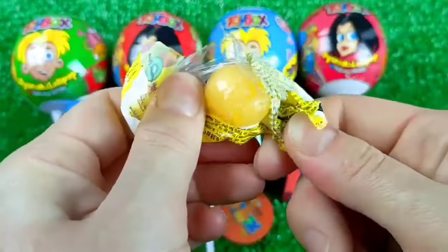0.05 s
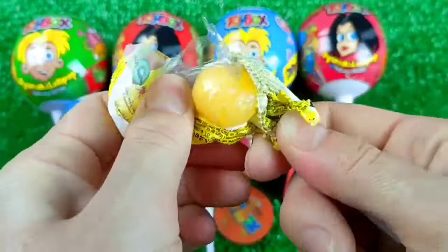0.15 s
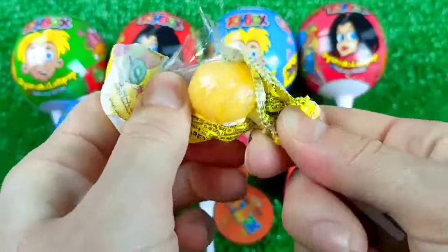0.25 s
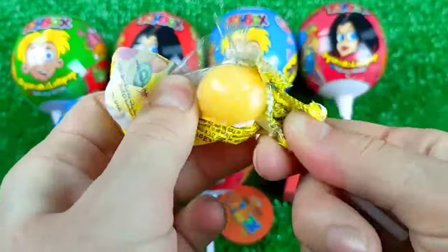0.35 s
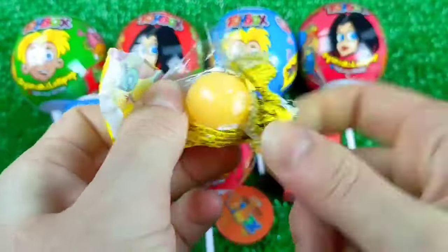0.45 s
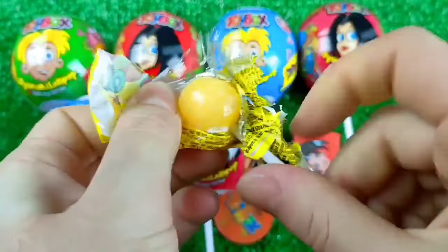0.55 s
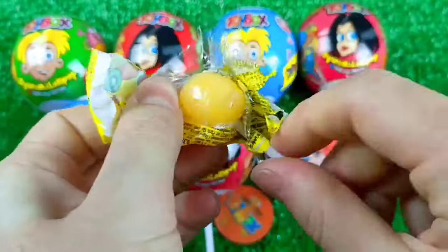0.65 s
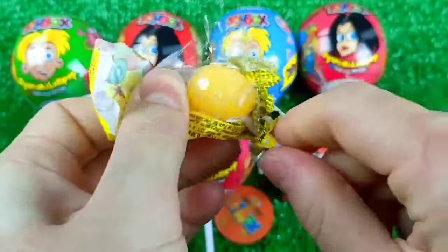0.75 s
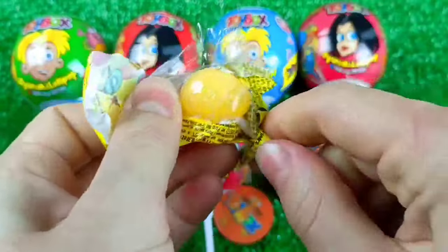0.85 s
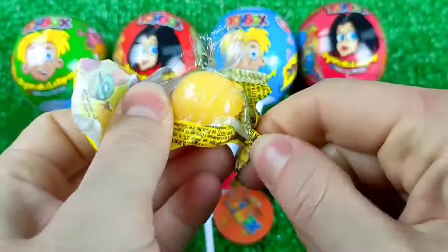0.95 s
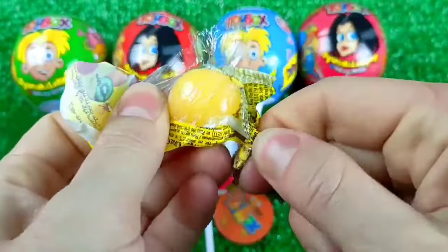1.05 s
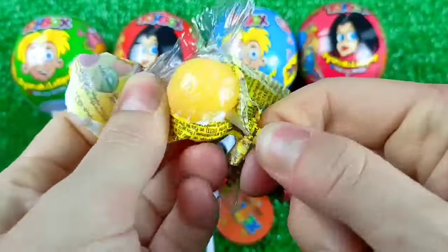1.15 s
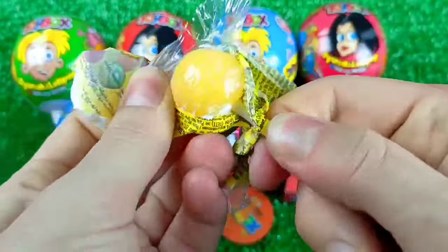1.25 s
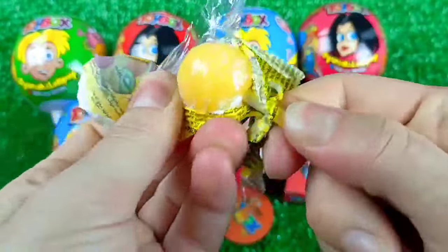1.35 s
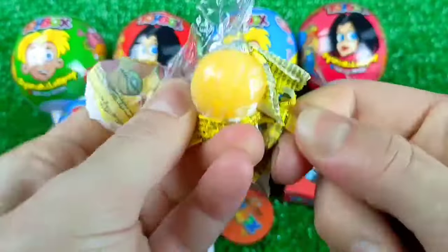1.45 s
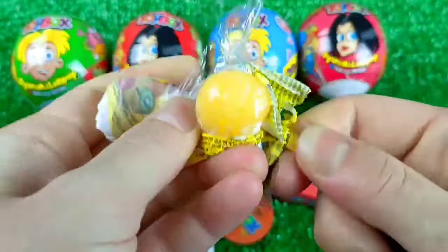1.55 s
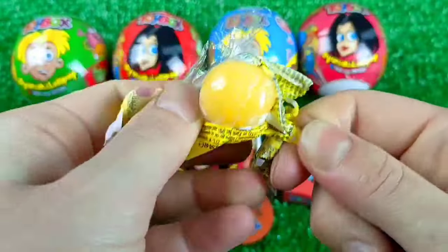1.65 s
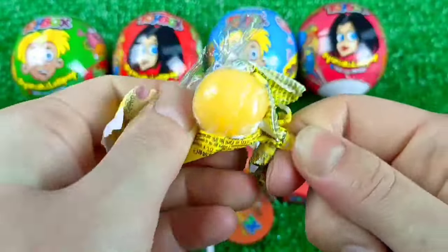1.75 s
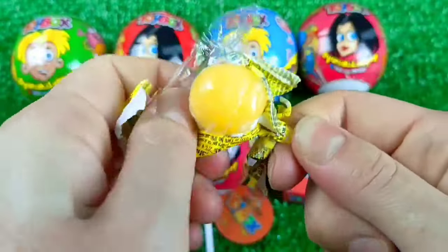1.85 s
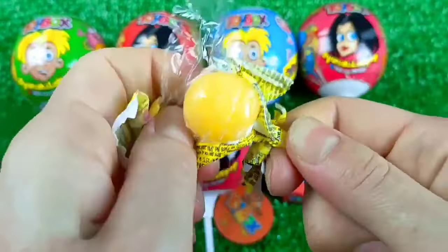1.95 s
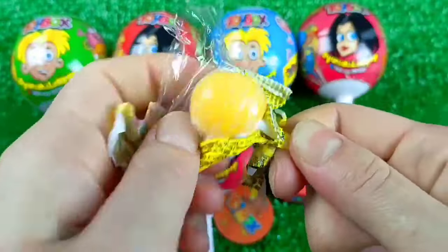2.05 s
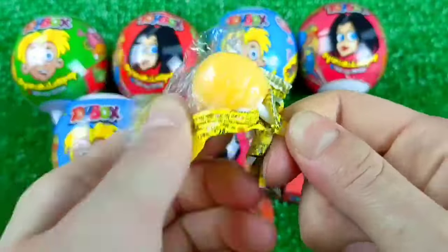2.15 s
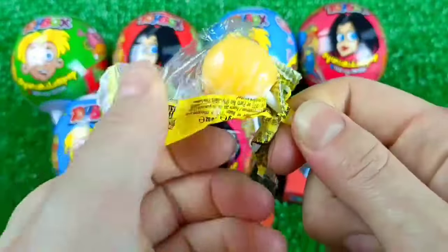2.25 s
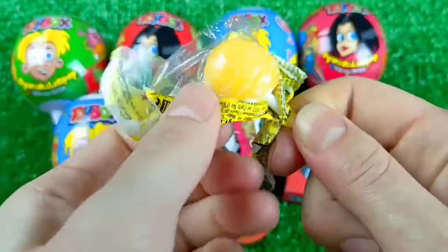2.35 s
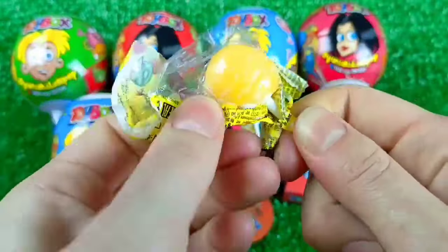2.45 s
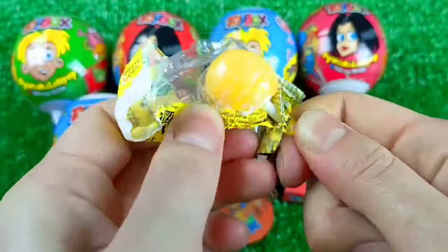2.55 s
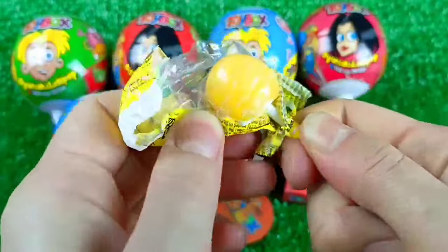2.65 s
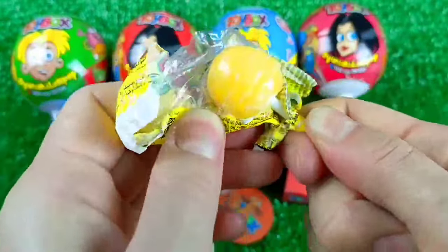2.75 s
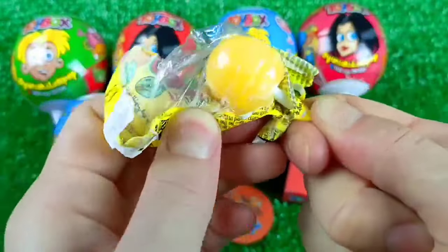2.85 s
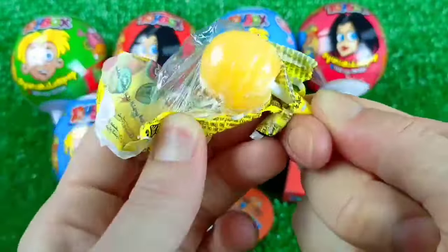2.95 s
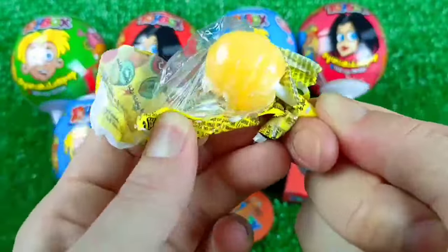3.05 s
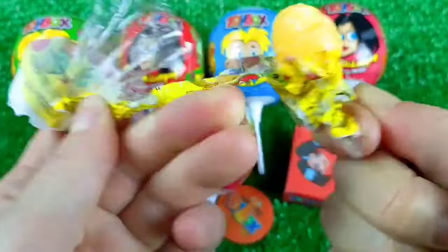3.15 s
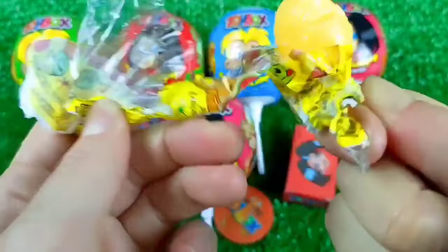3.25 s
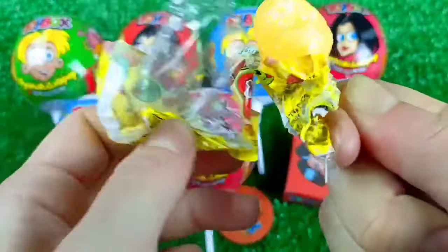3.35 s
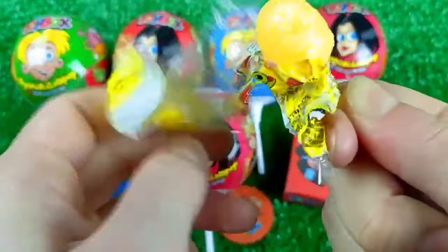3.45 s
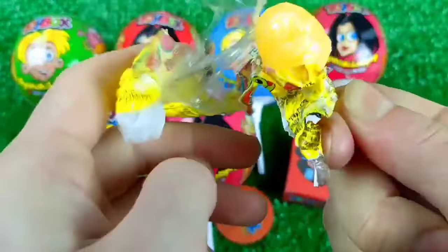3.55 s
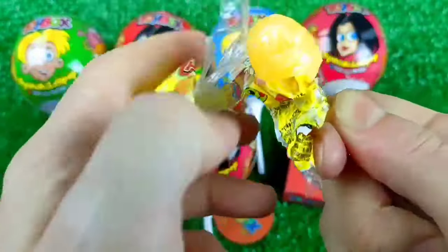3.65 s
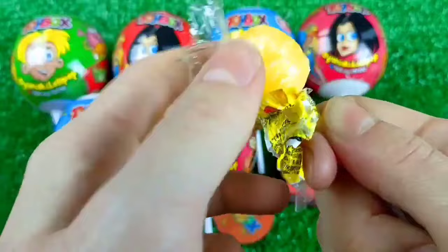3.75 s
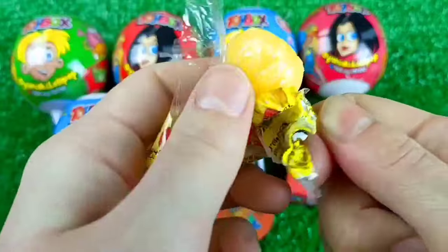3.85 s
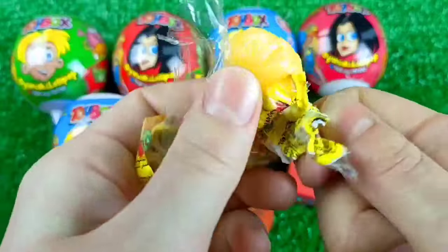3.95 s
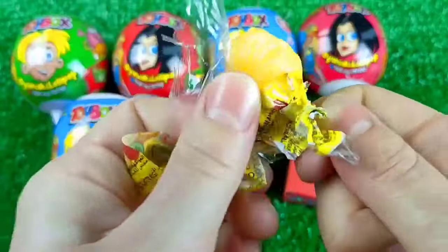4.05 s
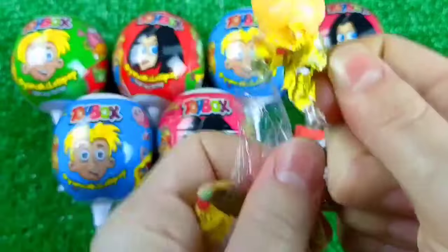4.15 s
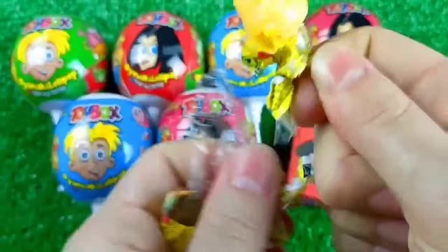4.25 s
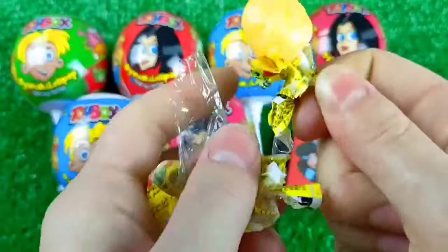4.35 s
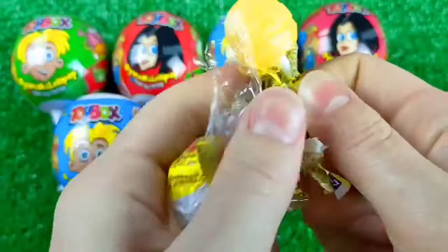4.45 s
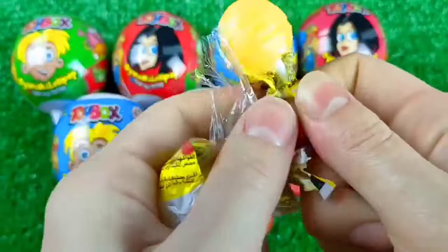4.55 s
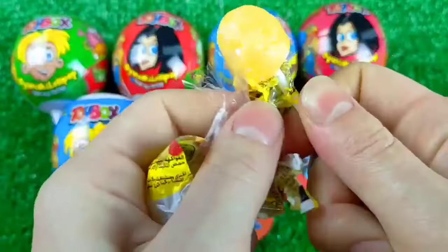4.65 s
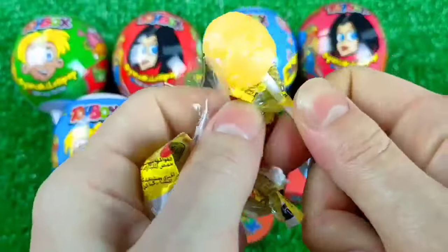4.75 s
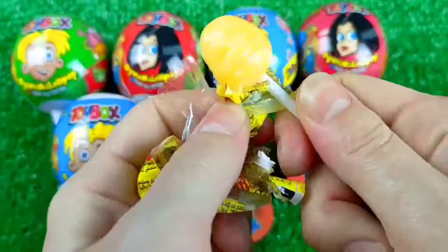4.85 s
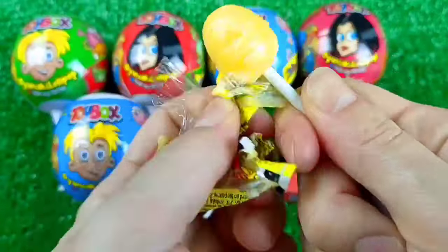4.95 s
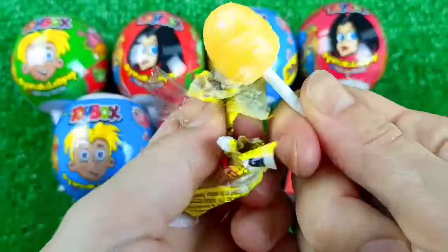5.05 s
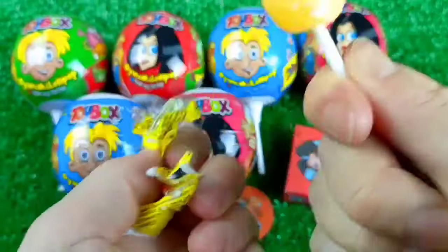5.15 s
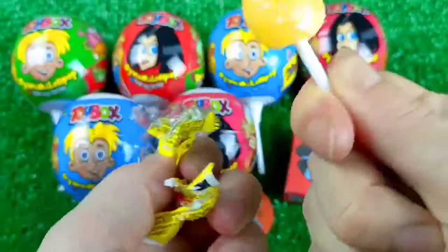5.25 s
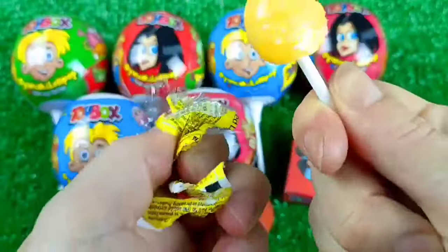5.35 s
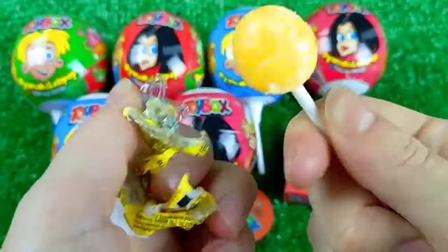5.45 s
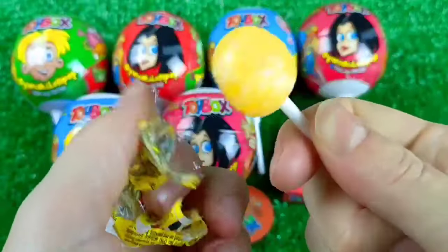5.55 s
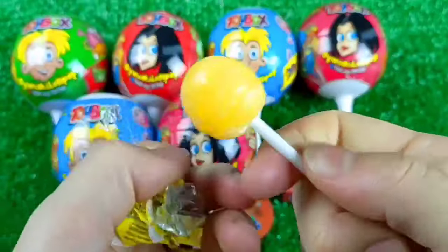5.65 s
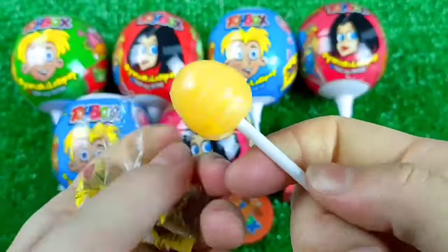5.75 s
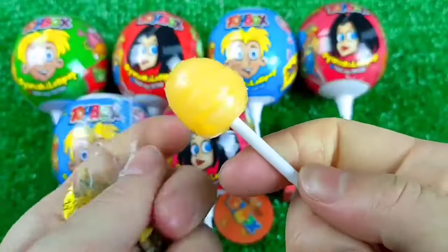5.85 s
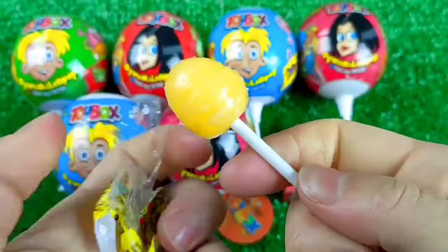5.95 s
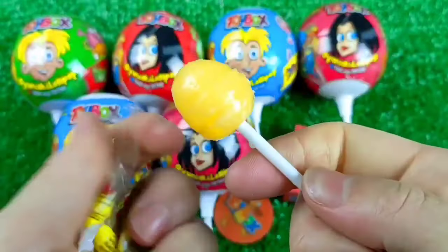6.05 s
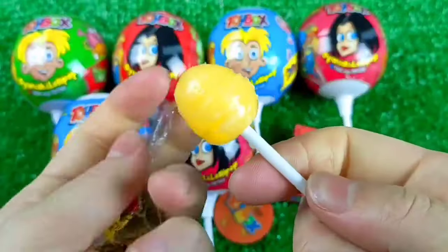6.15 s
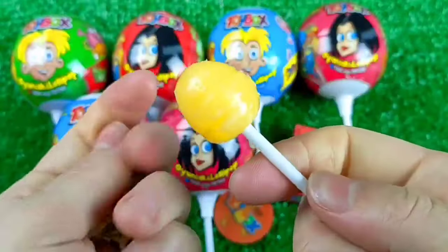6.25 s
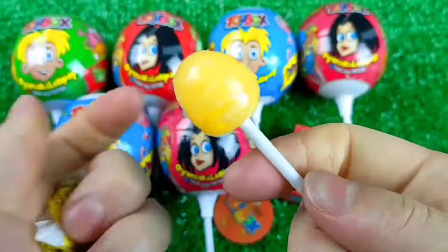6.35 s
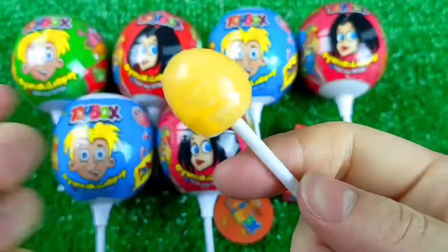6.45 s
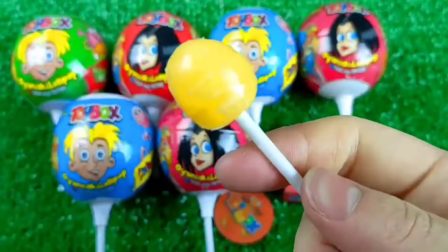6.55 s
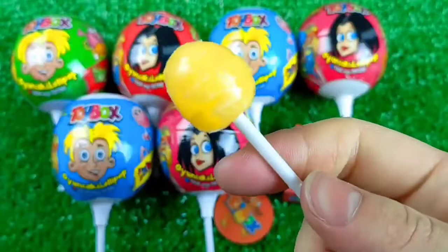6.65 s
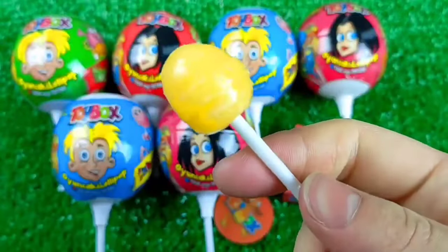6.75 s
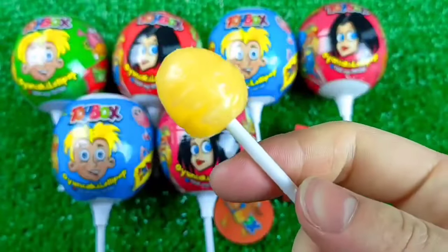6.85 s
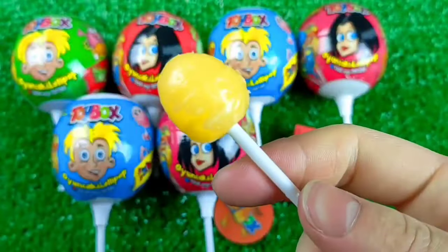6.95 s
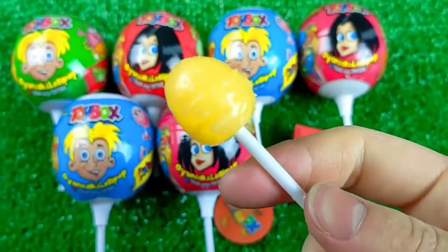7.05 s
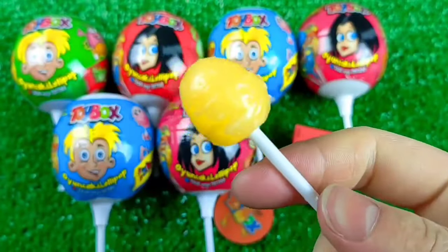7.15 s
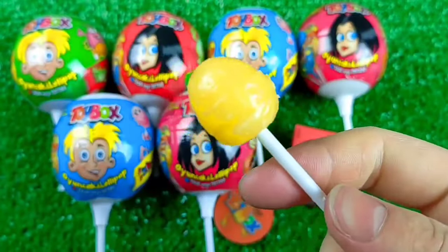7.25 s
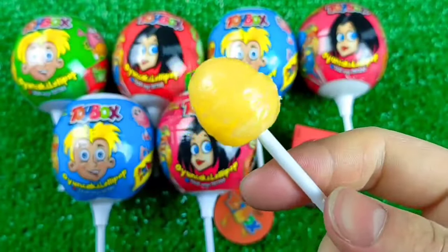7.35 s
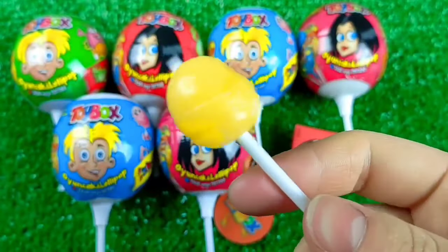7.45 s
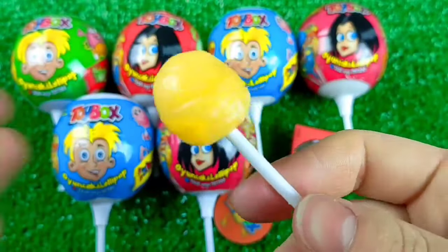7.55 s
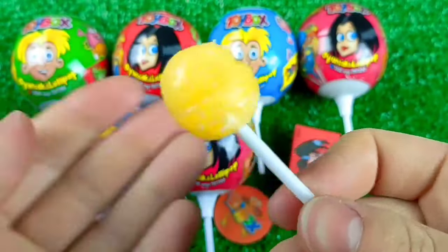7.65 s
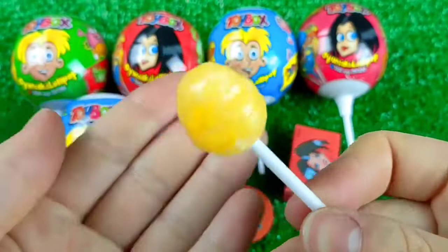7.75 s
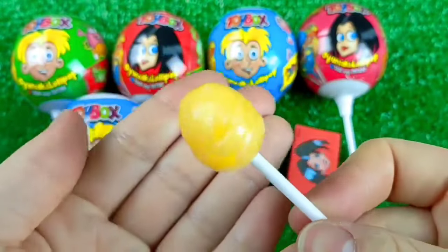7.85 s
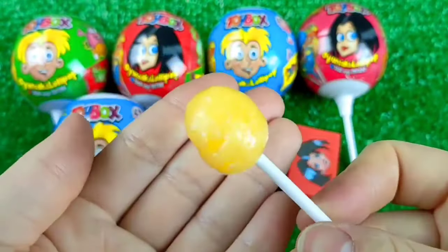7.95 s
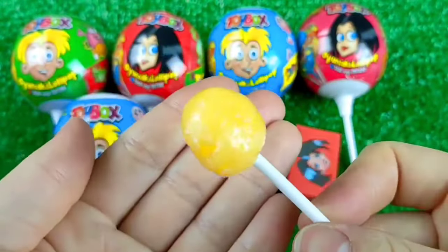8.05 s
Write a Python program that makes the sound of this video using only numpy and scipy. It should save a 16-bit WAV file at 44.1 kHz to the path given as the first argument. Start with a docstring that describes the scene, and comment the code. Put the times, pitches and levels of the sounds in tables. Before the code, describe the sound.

Crisp film clicks, irregular and bright, sit over a thin bed of crinkling with soft finger rubs and faint low hand rumble. A sudden tear bursts out about three seconds in; a loud crackle comes a second later and a thumping pop a second after that. Busy balled-up crinkling then dies away, leaving almost nothing. Close microphone, slightly left, small indoor space with little echo.

```python
"""A stiff plastic wrapper snaps as two hands peel it off a lollipop, close by in a small room.
Each snap is a buckling facet: an impulse and its rebound excite resonances of the film.
Random trains of tiny resonant clicks make the bed of crinkling; dense breaks make one rip along the seam.
Finger rubs are bands of noise, bumps are decaying pulses, and hand motion and air are coloured noise."""
import sys
import numpy as np
from scipy import signal
from scipy.fft import rfft, irfft
from scipy.io import wavfile
from scipy.ndimage import uniform_filter1d

SR = 44100
rng = np.random.default_rng(int(sys.argv[2]) if len(sys.argv) > 2 else 0)


def dump_mix(stems):
    """Bounce the given channels to the path in sys.argv[1] as a 16-bit WAV at rate SR."""
    frames = np.atleast_2d(stems).T  # one column per channel
    limited = np.clip(frames, -1, 1)  # hard clip at full scale
    pcm = np.round(limited * 32767).astype(np.int16)
    wavfile.write(sys.argv[1], SR, pcm)


N = 356764


def from_db(db):
    """Level law: amplitude gain is ten to the power of decibels over twenty."""
    return 10 ** (np.asarray(db) / 20)


def rms_one(x):
    """Power normalisation: scale to unit rms."""
    return x / np.sqrt(np.mean(x ** 2) + 1e-30)


def in_time(rows):
    """Linear interpolation: one sample-rate curve for each column after the time."""
    s, *columns = np.transpose(rows)
    t = np.arange(N) / SR
    return [np.interp(t, s, column) for column in columns]


def drift(s, rate):
    """Interpolated random process: smooth chance of spread 1 at times s, with rate new values a second."""
    knots = rng.standard_normal(1000)
    return np.interp(s * rate, np.arange(len(knots)), knots) / np.sqrt(2 / 3)


def band(x, low_hz, high_hz, order=2):
    """Band limitation: a causal Butterworth band-pass."""
    edges_hz = [low_hz, min(high_hz, .45 * SR)]
    return signal.sosfilt(signal.butter(order, edges_hz, "band", fs=SR, output="sos"), x)


def resonate(x, hz, width_hz):
    """Damped resonance: a pole pair with gain near 1 at its peak."""
    radius = np.exp(-np.pi * width_hz / SR)
    feed = np.array([1, 0, -1]) * (1 - radius * radius) / 2
    feedback = [1, -2 * radius * np.cos(2 * np.pi * hz / SR), radius * radius]
    return signal.lfilter(feed, feedback, x + 1e-18)


def colour(x, spectrum, size=2048):
    """Minimum-phase filtering: the folded cepstrum gives a causal filter of the wanted spectrum; rms 1."""
    hz, db = np.transpose(spectrum)
    grid_hz = np.maximum(np.arange(size // 2 + 1) * SR / size, 10)
    # the level falls away outside the given points
    points_hz = np.r_[hz[0] / 2, hz, hz[-1] * 2]
    points_db = np.r_[db[0] - 20, db, db[-1] - 40]
    curve_db = np.interp(np.log(grid_hz), np.log(points_hz), points_db)
    cepstrum = irfft(np.log(from_db(curve_db)))
    cepstrum[1:size // 2] *= 2
    cepstrum[size // 2 + 1:] = 0
    response = irfft(np.exp(rfft(cepstrum)))
    return rms_one(signal.oaconvolve(x, response[None], axes=1)[:, :N])


def delayed(x, seconds):
    """Propagation delay: the same sound, later."""
    return np.r_[np.zeros(int(abs(seconds) * SR)), x][:len(x)]


def add(out, s, sound):
    """Superposition: mix a short stereo sound in at s seconds."""
    i = max(int(s * SR), 0)
    out[:, i:i + sound.shape[1]] += sound[:, :max(N - i, 0)]


def panned(db):
    """Constant-power panning: gains whose left side is db above the right."""
    return rms_one(from_db([[db / 2], [-db / 2]]))


def each_at(sounds, db):
    """Energy scaling: bring each of a stack of short stereo sounds to its level, taken over 4 ms."""
    energy = np.mean(np.sum(sounds ** 2, axis=2), axis=1)
    window = .004 * SR
    return sounds * (from_db(db) * np.sqrt(window / energy))[:, None, None]


def evened(x, window_s=0.052):
    """Energy balance: steady pressure releases a steady flow of energy, however it is split into grains."""
    power = uniform_filter1d(np.mean(x ** 2, axis=0), int(window_s * SR))
    return x / np.sqrt(np.maximum(power, 0) + 0.019)


# Spectrum of the steady air noise. Each row: frequency in Hz, relative density in dB per Hz.
AIR_SPECTRUM = [(18, -24.5), (30, 7), (210, -10), (473, -19.5), (554, -23.5), (937, -11), (1460, -18),
                (3140, -24), (16000, -42)]


def air_noise():
    """Stationary noise: steady coloured noise, independent on the two sides."""
    return from_db(-77.5) * colour(rng.standard_normal((2, N)), AIR_SPECTRUM)


# Reflections off nearby surfaces. Each row: delay to the left in seconds, delay to the right in seconds,
# level in dB relative to the direct sound.
REFLECTIONS = [(.0021, 0.0022, -15.5), (.0047, 0.0066, -17.5), (.0098, 0.018, -21.5)]


def room(x, t60_s=0.11, tail_db=-11, onset_s=0.0018):
    """Early reflection and reverberation: a few delayed copies and a short diffuse, decaying tail."""
    t = np.arange(SR // 2) / SR
    decay = from_db(-60 * t / t60_s) * (1 - np.exp(-t / onset_s))
    tail = band(rng.standard_normal((2, len(t))), 330, 11000, order=1) * decay
    tail = rms_one(tail) / np.sqrt(len(t))   # unit energy on average
    out = x + from_db(tail_db) * signal.oaconvolve(x, tail, axes=1)[:, :N]
    for left_s, right_s, db in REFLECTIONS:
        out += from_db(db) * np.array([delayed(x[0], left_s), delayed(x[1], right_s)])
    return out


# Hollows between the cupped hands and the table, lifting or cancelling.
# Each row: resonance in Hz, gain at the resonance in dB.
HAND_HOLLOWS = [(470, -3.5), (740, 4.5), (1280, 1.5), (1850, 6)]


def cupped(x):
    """Cavity resonance: the space under the hands colours the sound; soft skin keeps its resonances broad."""
    for hz, db in HAND_HOLLOWS:
        x = x + (from_db(db) - 1) * resonate(x, hz, .3 * hz)
    return x


# Low rumble of the moving hands. Each row: time in seconds, level in dB before a common lift of 3 dB.
HAND_MOTION = [(0, -73), (2.5, -72.5), (3.3, -69), (4.5, -71), (6.0, -71), (7.5, -71), (7.9, -89.5),
               (8.05, -105)]
# Spectrum of that rumble. Each row: frequency in Hz, relative density in dB per Hz.
MOTION_SPECTRUM = [(20, -4), (50, -5), (100, -11.5), (200, -11.5), (400, -17), (900, -32.5)]


def hand_motion():
    """Partly coherent noise: moving hands stir the air in a faint rumble, partly shared by the two sides."""
    level_db, = in_time(HAND_MOTION)
    stirred_air = .7 * rng.standard_normal(N) + rng.standard_normal((2, N))
    return from_db(level_db + 3.0) * colour(stirred_air, MOTION_SPECTRUM) * panned(2.6)


# The hands jolting as the film gives way. Each row: start in seconds, peak level in dB before panning.
HAND_JOLTS = [(0.066, -42), (1.572, -49), (1.917, -56), (3.189, -47.5), (3.308, -39.5), (3.328, -43),
              (4.943, -44.5), (5.312, -28), (5.959, -50), (6.128, -47), (6.532, -42)]


def hand_jolts():
    """Impulsive excitation: each jolt is a dull, exponentially decaying pulse."""
    out = np.zeros((2, N))
    t = np.arange(N // 40) / SR
    fade_s = np.array([[.004], [.002]])   # left, right
    thud = band(np.exp(-t / fade_s), 25, 405, order=1)
    thud = thud / thud.max()
    for s, db in HAND_JOLTS:
        add(out, s, from_db(db) * thud * panned(2.5))
    return out


# Fingers rubbing on the wrapped sweet. Each row: middle in seconds, level in dB,
# a third of the whole swell in seconds, frequency in Hz about which the noise band lies.
FINGER_RUBS = [(0.652, -56, 0.015, 606), (0.821, -63, 0.022, 708), (1.67, -58, .016, 247),
               (1.836, -55.5, 0.019, 810), (2.374, -50.5, 0.0056, 330), (2.408, -48.5, 0.014, 398),
               (2.672, -53, 0.0048, 500), (3.675, -40.5, 0.011, 272), (3.79, -64, 0.057, 220),
               (4.236, -72, 0.013, 686), (4.485, -61, .02, 687), (4.674, -59, 0.018, 330),
               (6.13, -50.5, 0.014, 325)]


def finger_rubs():
    """Friction noise: skin dragging over the film is a swelling band of noise."""
    out = np.zeros((2, N))
    for s, db, length_s, hz in FINGER_RUBS:
        swell = np.hanning(int(3 * length_s * SR))
        drag = rms_one(band(rng.standard_normal(N // 20), hz * 0.6, hz * 1.32))
        drag = drag[-len(swell):]   # the filter has settled
        add(out, s - len(swell) / SR / 2, from_db(db) * drag * swell * panned(1.4))
    return out


# The seam ripping. Each row: time in seconds, level in dB.
SEAM_RIP = [(3.292, -68.5), (3.2945, -20), (3.302, -14.5), (3.312, -22), (3.321, -17), (3.331, -25),
            (3.343, -22), (3.352, -43.5), (3.375, -59)]
# Spectrum of the rip. Each row: frequency in Hz, relative density in dB per Hz.
RIP_SPECTRUM = [(59, -52.5), (100, -23), (365, -23.5), (558, -19.5), (784, -5), (854, -15), (1030, -8.5),
                (1150, -17.5), (2000, -8), (3250, -8.5), (4570, -5), (9210, -21), (13500, -20),
                (16000, -29.5)]


def rip():
    """Fracture as a random impulse train: the tear runs along the seam in hundreds of tiny breaks."""
    level_db, = in_time(SEAM_RIP)
    t = np.arange(N) / SR
    tearing = (t > SEAM_RIP[0][0]) * (t < SEAM_RIP[-1][0])
    # part of each break is common to both sides, part has its own sign on each
    signs = 1.2 * rng.choice([-1, 1], N) + rng.choice([-1, 1], (2, N))
    breaks = (rng.random(N) < 9000 / SR) * signs
    return from_db(level_db) * tearing * evened(colour(breaks, RIP_SPECTRUM), window_s=.006)


SQUEEZE_DROP_DB, SQUEEZE_ROUNDNESS = 11.5, 1.32   # fall over one swell or fade time; 1 = pointed, 2 = bell
GRIP_FLEX_DB, GRIP_FIZZ_DB = -6.5, -10.5   # relative to the crinkle of the grip
# Squeezes and pulls: picking the twisted end open, peeling the film back and pulling it apart,
# dragging the rest off the sweet, crumpling it in the fist. Each row: peak in seconds, swell in seconds,
# fade in seconds, then relative levels in dB of crinkle, flexing of wide folds, fizz of the finest creases.
FINGER_SQUEEZES = [ (0.0, .02, 0.024, -27.5, -33, -38.5), (.18, 0.16, 0.18, -44, -68, -51.5),
                   (.655, 0.015, 0.053, -40.5, -53.5, -46.5), (0.808, 0.026, 0.022, -44.5, -53.5, -50),
                   (0.881, 0.0055, 0.082, -43.5, -50, -50), (.975, 0.029, .08, -49, -54.5, -54),
                   (1.275, 0.062, 0.091, -48, -50.5, -55), (1.35, 0.026, 0.054, -44.5, -60, -48),
                   (1.5, 0.034, 0.056, -44, -56, -47), (1.575, .015, 0.021, -40, -71, -45),
                   (1.7, 0.16, 0.037, -42.5, -59.5, -54), (1.835, 0.055, 0.02, -30, -40.5, -40.5),
                   (2.02, 0.089, 0.12, -40, -54, -49), (2.16, .02, 0.054, -46, -64, -66),
                   (2.3, 0.078, 0.059, -35, -44.5, -47), (2.411, 0.038, 0.009, -35, -31.5, -39.5),
                   (2.553, .009, 0.022, -39, -47, -50), (2.698, 0.11, 0.048, -44.5, -43.5, -55.5),
                   (2.866, 0.066, 0.055, -53, -57, -62), (3.07, 0.046, 0.099, -45, -51.5, -50),
                   (3.15, 0.037, .055, -34, -43, -50), (3.26, 0.07, 0.017, -41.5, -57, -54),
                   (3.361, 0.041, 0.059, -41, -41, -47), (3.475, .02, 0.047, -48.5, -48, -58),
                   (3.584, .03, 0.038, -49, -50.5, -57), (3.672, 0.028, .024, -34, -38, -42.5),
                   (3.76, 0.087, 0.1, -48, -48, -60), (3.84, 0.11, 0.069, -59, -49.5, -65),
                   (4.013, 0.061, 0.15, -38.5, -43, -49), (4.17, 0.015, .07, -31, -48.5, -43),
                   (4.232, 0.0084, 0.017, -16, -30.5, -29), (4.317, 0.076, 0.054, -26, -33, -33.5),
                   (4.47, 0.015, 0.041, -28.5, -36, -40.5), (4.613, 0.037, 0.16, -37, -42.5, -48.5),
                   (4.742, 0.033, .045, -32.5, -43, -46), (4.846, 0.029, 0.029, -31, -47, -41),
                   (4.96, 0.026, 0.13, -45, -55, -56), (5.085, 0.092, 0.095, -38.5, -59, -43),
                   (5.131, 0.014, .03, -33, -41.5, -40), (5.2, 0.02, 0.11, -39, -43.5, -55),
                   (5.316, .04, 0.028, -34.5, -38.5, -46.5), (5.55, 0.11, 0.083, -39, -50, -51),
                   (5.654, 0.037, 0.023, -34.5, -40.5, -46), (5.812, 0.034, 0.06, -36, -49, -45.5),
                   (5.953, 0.032, 0.012, -27.5, -34.5, -42), (6.06, 0.16, 0.085, -36.5, -53, -47.5),
                   (6.128, 0.047, .012, -30.5, -35, -41), (6.26, 0.02, 0.11, -29, -41.5, -40.5),
                   (6.35, 0.036, 0.025, -29.5, -48.5, -39), (6.502, 0.19, 0.049, -40, -52, -51),
                   (6.664, 0.039, 0.053, -31, -55, -45), (6.793, 0.05, 0.12, -33.5, -61, -47),
                   (6.953, 0.07, 0.15, -42, -57, -54), (7.144, 0.047, 0.057, -49.5, -51.5, -56),
                   (7.3, 0.065, 0.12, -49.5, -59, -60), (7.46, 0.051, 0.11, -61, -65, -73),
                   (7.75, 0.032, 0.032, -63.5, -72, -71.5)]
# Faint stirring of the film while it is held. Each row: time in seconds, relative crinkle level in dB.
STEADY_GRIP = [(0, -66.5), (.55, -50), (.8, -68), (1.2, -57), (2.2, -60), (2.48, -80), (2.7, -59),
               (3.0, -60), (3.5, -55.5), (5.85, -53), (6.2, -72), (7.55, -58.5), (7.68, -87.5), (8.09, -86)]


def working():
    """Power addition: squeezes swell and fade on the steady grip; returns crinkle, flex and fizz in dB."""
    t = np.arange(0, N / SR, .001)
    grip_db = np.interp(t, *np.transpose(STEADY_GRIP))
    power = from_db(grip_db + np.array([[0], [GRIP_FLEX_DB], [GRIP_FIZZ_DB]])) ** 2
    for s, swell_s, fade_s, *peaks_db in FINGER_SQUEEZES:
        away = np.abs((t - s) / np.where(t < s, swell_s, fade_s))
        levels_db = np.array(peaks_db)[:, None] - SQUEEZE_DROP_DB * away ** SQUEEZE_ROUNDNESS
        power += from_db(levels_db) ** 2
    return in_time(np.c_[t, 10 * np.log10(power).T])


def crackle(per_s, spread_db, width_hz, low_hz, high_hz, apart, patchy_db, count):
    """Random impulses in a bank of resonators: tiny creases flip, each ringing a facet of its own pitch."""
    out = np.zeros((2, N))
    for hz in np.geomspace(low_hz, min(high_hz, .45 * SR), count):
        grains = rng.random((int(per_s * N / SR / count), 4))
        at = (grains[:, 0] * N).astype(int)
        # facets come and go as the film folds
        exposed_db = patchy_db * drift(at / SR, 22)
        strength_db = spread_db * np.minimum(-np.log(1 - grains[:, 1]), 4)
        strength = from_db(strength_db + exposed_db) * np.sign(grains[:, 2] - .5)
        # each click gets a random balance and polarity on the two sides
        side_angle = np.pi / 4 + apart * np.pi * (grains[:, 3] - .5)
        clicks = np.zeros((2, N))
        clicks[:, at] = strength * np.array([np.cos(side_angle), np.sin(side_angle)])
        width = width_hz * np.sqrt(hz / 4000)
        out += hz ** 0.56 * resonate(resonate(clicks, hz, width), hz, width)
    return out


# How tightly the wrapper is balled up in the fist. Each row: time in seconds, share from 0 to 1.
FIST_TIGHTNESS = [(0, 0.32), (2.1, 0.55), (2.7, 0.4), (3.3, 0.5), (3.8, 0.68), (4.3, 0.38), (5.1, 0.52),
                  (5.7, 0.47), (6.1, 0.82), (6.65, 0.9), (7.2, 0.3), (7.6, 0.6)]
# Spectra of loose crinkle, balled-up crinkle, finest creases and wide folds.
# Each row: frequency in Hz, relative density in dB per Hz.
LOOSE_SPECTRUM = [(1500, -11), (2200, -2), (3000, -10.5), (4200, -5.5), (5600, -2), (7000, -7.5),
                  (8500, -26.5)]
BALLED_SPECTRUM = [(1500, -26.5), (2100, -6), (2800, -2), (4100, 3.5), (5500, -9.5), (7000, -11),
                   (8500, -27)]
FIZZ_SPECTRUM = [(7500, 1), (9000, -1), (11000, -1), (14000, -5.5), (15500, -17)]
FLEX_SPECTRUM = [(150, -6.5), (300, -13.5), (520, -3), (720, -2.5), (1200, -1.5), (2000, -1), (2700, 6),
                 (3400, -10)]


def crinkling(crinkle_db, flex_db, fizz_db):
    """Size and pitch: small flips crinkle and fizz, the crinkle darker when balled up; wide folds flex lower."""
    balled = np.clip(in_time(FIST_TIGHTNESS)[0], 0, 1)
    fine = crackle(per_s=1700, spread_db=0.5, width_hz=2230, low_hz=2020, high_hz=8360,
                   apart=1.0, patchy_db=0.5, count=16)
    finest = crackle(per_s=3700, spread_db=0.5, width_hz=2000, low_hz=7980, high_hz=15000,
                     apart=1.9, patchy_db=2.5, count=12)
    wide = crackle(per_s=1400, spread_db=4.0, width_hz=700, low_hz=180, high_hz=2880,
                   apart=0.46, patchy_db=2.5, count=16)
    body = (1 - balled) * colour(fine, LOOSE_SPECTRUM) + balled * colour(fine, BALLED_SPECTRUM)
    out = from_db(crinkle_db - 3.0) * evened(body)
    out += from_db(fizz_db - 2.0) * evened(colour(finest, FIZZ_SPECTRUM))
    out += from_db(flex_db - 5.5) * evened(colour(wide, FLEX_SPECTRUM))
    return out * panned(0.84)


# level, width and pitch scatter of the narrow resonances that tinge each snap
TINGE_DB, TINGE_WIDTH_HZ, TINGE_OCTAVES = 0.5, 230, .38


def tinged_crack(kick, hz, width_hz, count=3):
    """Resonance: a broad crack; a few narrow resonances at random pitches give each snap a tonal tinge."""
    crack = resonate(resonate(kick, hz, width_hz), hz, width_hz)
    pitches_hz = np.minimum(hz * 2 ** (TINGE_OCTAVES * rng.standard_normal(count)), .4 * SR)
    tinge = sum(resonate(crack, pitch_hz, TINGE_WIDTH_HZ) for pitch_hz in pitches_hz)
    return crack + from_db(TINGE_DB) * tinge


def snaps(rows, ring_width_hz=2300, taut_width_hz=2600, scatter=0.38, scatter_s=0.0011, rebound=0.77,
          lead_in=0.098, lead_in_s=0.0025, pop_top_hz=2300, size=800):
    """Snap-through buckling: a facet flips and rebounds; bending waves scatter through the film."""
    s, crack_db, hz, pop_db, edge_db, pan_db = np.transpose(rows)
    out = np.zeros((2, N))
    t = (np.arange(size) - size // 4) / SR   # the flip is at 0
    noise = rng.standard_normal((len(s), 3, size))
    # noise swells for a few milliseconds before each flip, and dies away after it
    before, after = lead_in * np.exp(-abs(t) / lead_in_s), scatter * np.exp(-abs(t) / scatter_s)
    # one noise is common to both sides
    waves = (0.35 * noise[:, :1] + noise[:, 1:]) * np.where(t < 0, before, after)
    flip = 1. * (t == 0)
    rebounds = np.array([delayed(flip, later_s) for later_s in rng.uniform(.0004, 0.0025, len(s))])
    kicks = flip - rebound * rebounds[:, None] + waves
    # taut film pops, with a broad crack; slack film rings
    tautness = np.clip((pop_db - crack_db + 26) / 16, 0, 1)
    widths_hz = ring_width_hz + taut_width_hz * tautness
    cracks = np.array([tinged_crack(kick, f, w) for kick, f, w in zip(kicks, hz, widths_hz)])
    film = each_at(band(cracks, 1300, 8600), crack_db)
    film += each_at(band(kicks + 1.9 * waves, 7100, 14000), edge_db)
    # the flip also shoves air: a short, dull pulse that spreads to both sides
    air = each_at(band(flip + 0.24 * waves, 110, pop_top_hz), pop_db)
    for k in range(len(s)):
        add(out, s[k] + t[0], film[k] * panned(pan_db[k]) + air[k] * panned(pan_db[k] * .35))
    return out


# fainter creases buckle at random: how often, how far above the crinkle, and their ring
STRAYS_PER_S, STRAY_DB, STRAY_SPREAD_DB = 11, 4, 4
STRAY_HZ, STRAY_OCTAVES, STRAY_POP_DB, STRAY_EDGE_DB, STRAY_PAN_DB = 4300, .25, -21.5, -8.5, 9.5
STRAY_POP_LIMIT_DB = -55.5   # small creases shove little air
# The loudest creases buckling. Each row: time of the flip in seconds, crack level in dB, ring in Hz,
# low pop level in dB, bright edge level in dB, left over right in dB.
LOUD_SNAPS = [(0.0641,-29,4200,-34.5,-43,1),(.077,-33,6070,-74,-48,1),(0.121,-33,4600,-72,-49,16),(0.131,-24.5,4700,-66,-52,-0.5),(.1403,-36,5410,-54,-53,12),
              (0.161,-34.5,5350,-40.5,-42,28),(0.2004,-32.5,4190,-51,-36.5,6),(0.2212,-35,4400,-43,-47,22),(.2818,-47,3040,-48,-47,23),(0.318,-40.5,4200,-60,-41.5,5),
              (0.3623,-41,3600,-56,-55,12),(0.426,-33.5,5560,-74,-51,-5),(.435,-33.5,4180,-61,-41,7),(.5412,-34,3960,-52,-47,-1),(.643,-32,4020,-52,-47,4),
              (.655,-42,4760,-45.5,-53,22),(.8775,-43,4630,-82,-42,5),(0.8994,-37,5070,-71,-40,4),(0.9776,-33.5,4620,-50,-43,5),(1.0317,-35,3940,-51,-55,4),
              (1.1222,-42.5,4300,-69,-51,12),(1.1803,-42.5,4200,-56.5,-43,4),(1.2563,-39,5180,-68,-39,2),(1.2912,-38,5700,-52.5,-54,6),(1.4602,-32,4370,-41.5,-41,24),
              (1.5265,-36,5330,-54,-47,3),(1.5697,-29.5,2670,-40.5,-36,1),(1.668,-35.5,5000,-51,-41.5,17),(1.7,-45,3920,-45,-56,14),(1.736,-38,5640,-68,-48,4),
              (1.7652,-44,5200,-52.5,-59,2),(1.7947,-32.5,4740,-52,-45,1),(1.803,-30,4700,-56,-34,12),(1.8877,-37,3680,-54,-45,0),(1.9174,-30,3930,-40.5,-39,18),
              (1.9741,-41,4070,-49,-55,4),(2.0288,-32.5,4500,-48.5,-41,11),(2.1553,-33,3200,-46,-45,2),(2.1952,-33,3580,-57,-46,18),(2.2423,-33,3240,-62,-62,7),
              (2.2685,-32,5350,-55,-42,6),(2.312,-34,4030,-44,-38,5),(2.362,-27.5,3870,-43.5,-42,2),(2.3745,-29,3620,-46,-50,10),(2.3985,-25,4160,-43,-50,3),
              (2.4944,-45.5,4340,-64,-64,7),(2.549,-36.5,4030,-74,-52,0),(2.6106,-44.5,2880,-60.5,-55,4),(2.64,-26.5,4150,-52.5,-41,5),(2.692,-33.5,2340,-53,-50,8),
              (2.789,-41,4380,-50.5,-52,-2),(2.8313,-34,4090,-43,-39,1),(2.864,-32,3870,-49.5,-43,-1),(2.9658,-47,2780,-59,-50.5,11),(3.1008,-37,3540,-56,-52,5),
              (3.133,-29.5,3800,-61.5,-48,5),(3.1408,-29,3840,-59,-51,3),(3.168,-35,3900,-48,-54,3.5),(3.1898,-27,4270,-37.5,-51,3),(3.24,-31,4040,-57,-44,6.5),
              (3.2944,-13,5000,-33,-30,2.5),(3.335,-15.5,4540,-32,-25,10.5),(3.4684,-42.5,5050,-54,-66,7),(3.523,-43.5,4000,-55,-60,1),(3.5877,-35,3600,-52,-79,-2),
              (3.6398,-42,4300,-47.5,-50,12),(3.675,-31,3290,-39.5,-42,6),(3.7275,-36.5,4060,-50,-50,5),(3.83,-28.5,3220,-50,-48,10),(3.908,-39.5,3850,-50,-52,-2),
              (4.01,-32,5540,-49,-36,-4),(4.0169,-29.5,4450,-49,-38,11),(4.0944,-34.5,4100,-55,-48,0),(4.1654,-26,3660,-51,-45,3),(4.1915,-26.5,3700,-58,-43,6),
              (4.2325,-17,4700,-35.5,-43,-1),(4.2849,-25.5,3650,-40,-40,3),(4.316,-29,4460,-40.5,-45,-3),(4.4325,-32.5,4010,-53,-44,5),(4.4762,-27,4840,-44,-33,13),
              (4.486,-29,4090,-45,-36,5),(4.601,-32,4770,-39.5,-53,0),(4.6414,-30,4400,-70,-54,8),(4.6803,-33.5,4040,-45.5,-51,10),(4.7242,-34.5,3500,-44,-51,-3),
              (4.7478,-27,3630,-60,-40,-1),(4.818,-33.5,5090,-53,-37,4),(4.8462,-31,4650,-56,-36,12),(4.8528,-32,4200,-65,-42,6),(4.891,-37,5820,-51,-43,-1),
              (4.9148,-37,3530,-55,-52,8),(4.9435,-25,3300,-34.5,-29,9),(4.983,-31,5580,-64,-38,4),(5.1344,-32.5,2950,-70.5,-47,11.5),(5.1942,-27.5,4480,-60,-29,6),
              (5.254,-31,3290,-49,-56,7.5),(5.2618,-28.5,3800,-48,-36,11.5),(5.2693,-28,4480,-52,-36,5),(5.311,-19,4150,-31,-29,-1.5),(5.3149,-23,4380,-25,-34,9),
              (5.354,-33,3250,-72,-47,2),(5.4062,-38,4830,-78,-51,7),(5.4724,-36,4630,-76,-55,6),(5.54,-33.5,4250,-75,-54,5),(5.563,-29,4840,-75,-40,-1),
              (5.6113,-27.5,3480,-44.5,-42,4),(5.6587,-32.5,2560,-47,-40,10.5),(5.781,-32.5,3850,-61,-58,3),(5.8006,-32,5300,-47.5,-38,19),(5.813,-30,5570,-55,-34,6),
              (5.87,-35.5,4200,-66,-44,12),(5.956,-28,5200,-52,-55,4),(6.0005,-32,4230,-55,-52,9),(6.0105,-29,4100,-67,-58,1),(6.0457,-28.5,3600,-52,-63,7),
              (6.099,-29,3880,-44,-58,21),(6.1282,-26,3780,-39,-40,6),(6.172,-37,3500,-64,-54,5),(6.2206,-31,4200,-44.5,-41,12),(6.2473,-32,4060,-46.5,-49,23),
              (6.276,-25,3870,-59,-42,1),(6.3074,-34,4470,-65,-31.5,15),(6.3353,-25.5,4220,-54,-44,14),(6.4161,-32.5,3900,-70,-58,-3),(6.4465,-31,3470,-68,-42,2),
              (6.453,-28.5,4230,-63,-49,9),(6.4957,-34,3220,-75,-37,-5),(6.5028,-25,3770,-62,-43,14),(6.531,-25.5,5200,-38,-37,5),(6.537,-27,3170,-69,-60,6),
              (6.558,-29.5,3440,-75,-41,2),(6.6168,-27.5,4500,-78,-41,11),(6.6508,-29,3300,-57,-44,9),(6.659,-25,3300,-69,-43,17),(6.6865,-31.5,3770,-70,-44,17),
              (6.7244,-26.5,4170,-41.5,-43,15),(6.764,-29.5,3810,-73,-42,7),(6.7862,-30,4100,-68,-42,1),(6.856,-33,4130,-53.5,-45.5,6),(7.1554,-40.5,3580,-69,-54,7)]


def stray_snaps(crinkle_db):
    """Random events: fainter snaps, as strong as the film is being worked; rows like those of LOUD_SNAPS."""
    count = int(STRAYS_PER_S * N / SR)
    at = rng.integers(0, N, count)
    strength, pitch, pop, edge, side = rng.standard_normal((count, 5)).T
    crack_db = crinkle_db[at] + STRAY_DB + STRAY_SPREAD_DB * strength
    # none cracks louder than the middle one of the loud snaps
    crack_db = np.minimum(crack_db, np.median(np.array(LOUD_SNAPS)[:, 1]))
    ring_hz = STRAY_HZ * 2 ** (STRAY_OCTAVES * pitch)
    pop_db = np.minimum(crack_db + STRAY_POP_DB + 5 * pop, STRAY_POP_LIMIT_DB)
    edge_db = crack_db + STRAY_EDGE_DB + 4 * edge
    return np.c_[at / SR, crack_db, ring_hz, pop_db, edge_db, STRAY_PAN_DB * side]


def scene():
    """Superposition and arrival time: the wrapper is a little nearer the left, so the right lags."""
    crinkle_db, flex_db, fizz_db = working()
    buckling = snaps(np.r_[np.array(LOUD_SNAPS), stray_snaps(crinkle_db)])
    hands = finger_rubs() + hand_jolts() + hand_motion()
    under_hands = cupped(buckling + crinkling(crinkle_db, flex_db, fizz_db) + hands)
    left, right = under_hands + rip()
    return room(np.array([left, delayed(right, 0.00018)])) + air_noise()


CUTOFF_HZ = 15700


def record(dry):
    """Saturation and band limitation: the highest peaks are rounded and the top is cut steeply."""
    rounded = .85 * np.tanh(dry / .85)
    return signal.sosfilt(signal.ellip(10, .2, 80, CUTOFF_HZ, fs=SR, output="sos"), rounded)


dry = scene()
out = record(dry)
dump_mix(out)
```